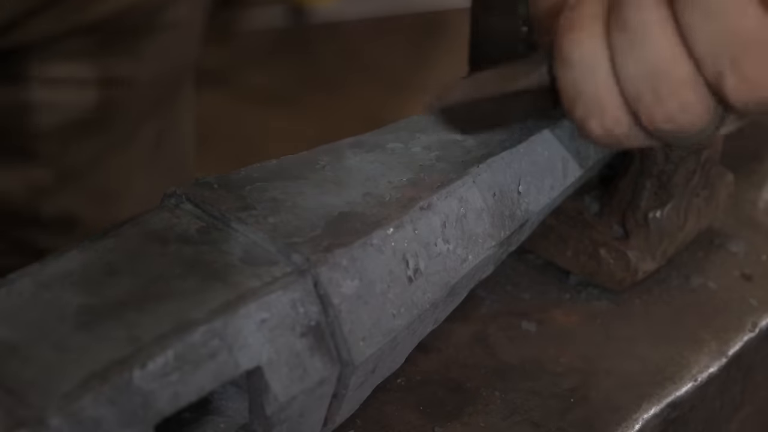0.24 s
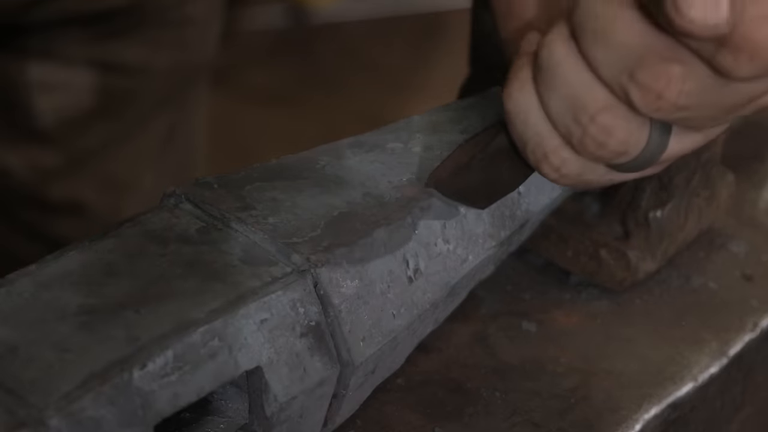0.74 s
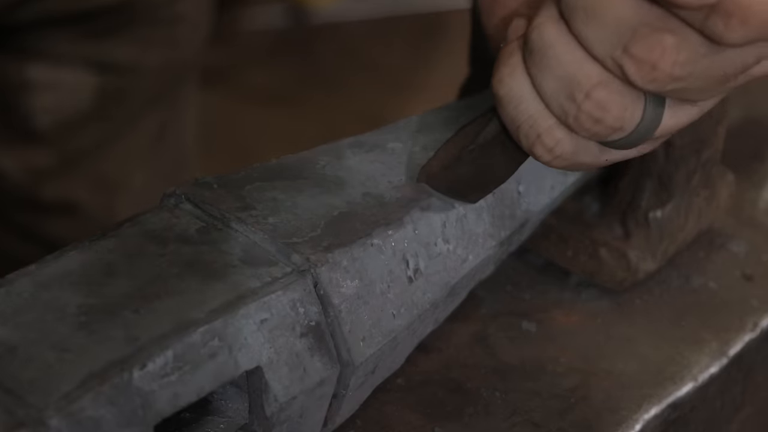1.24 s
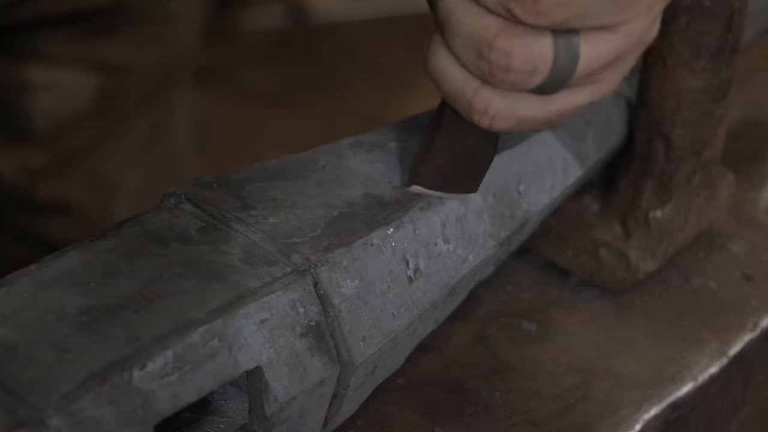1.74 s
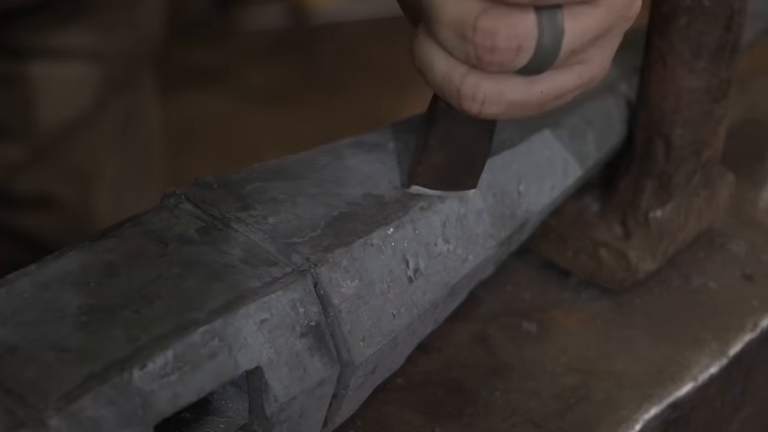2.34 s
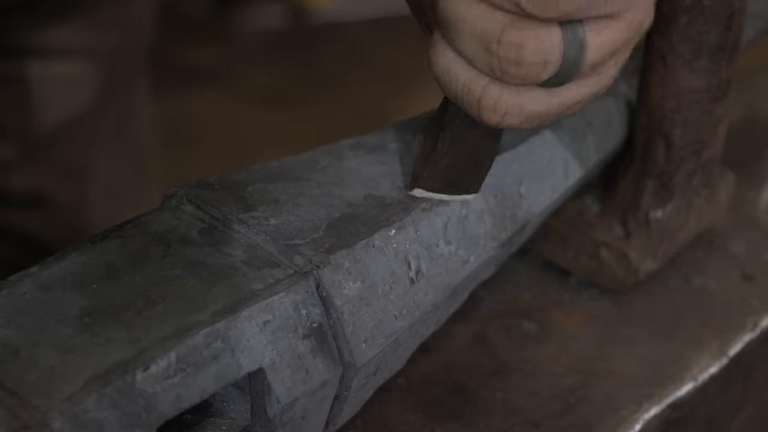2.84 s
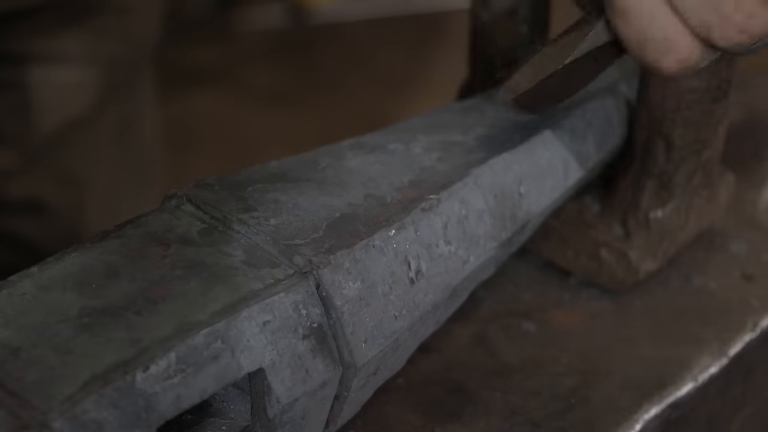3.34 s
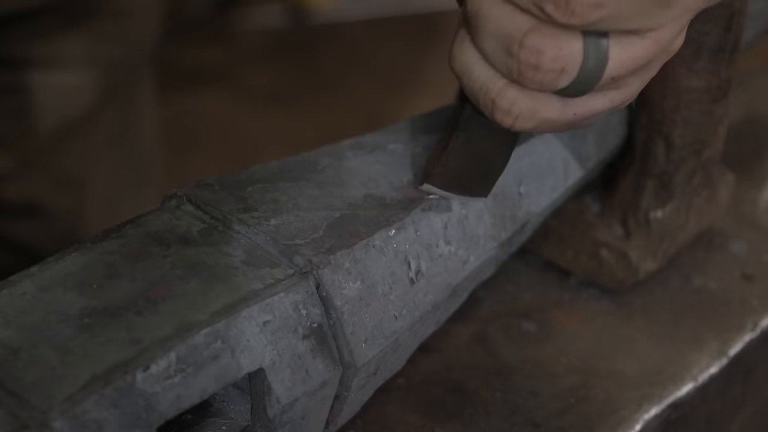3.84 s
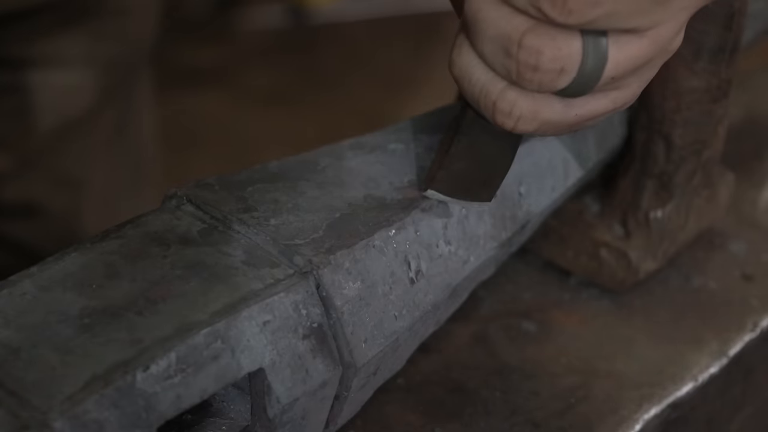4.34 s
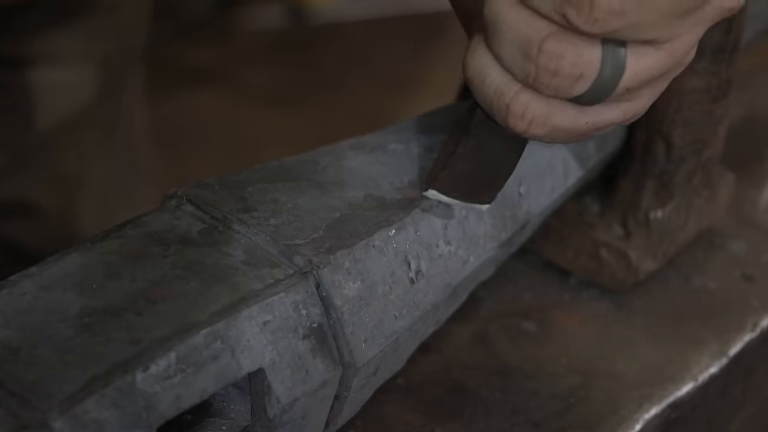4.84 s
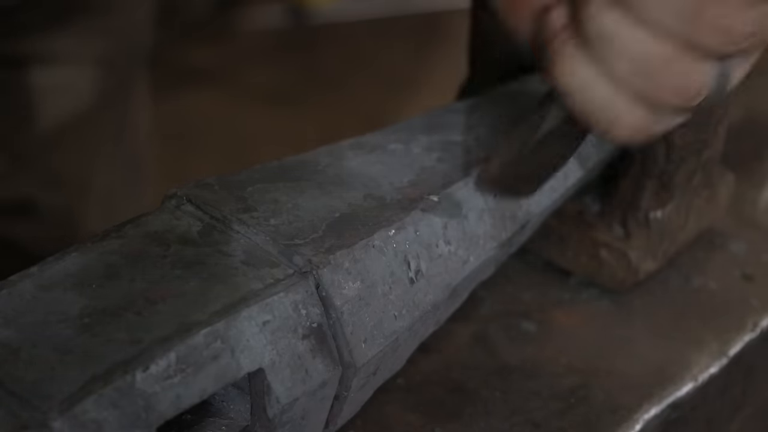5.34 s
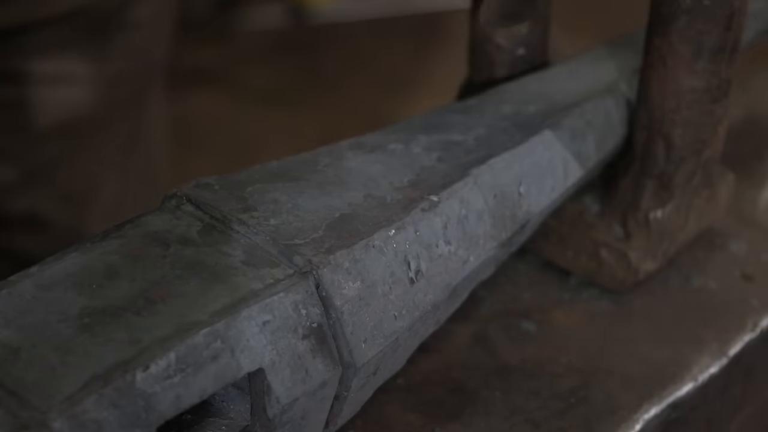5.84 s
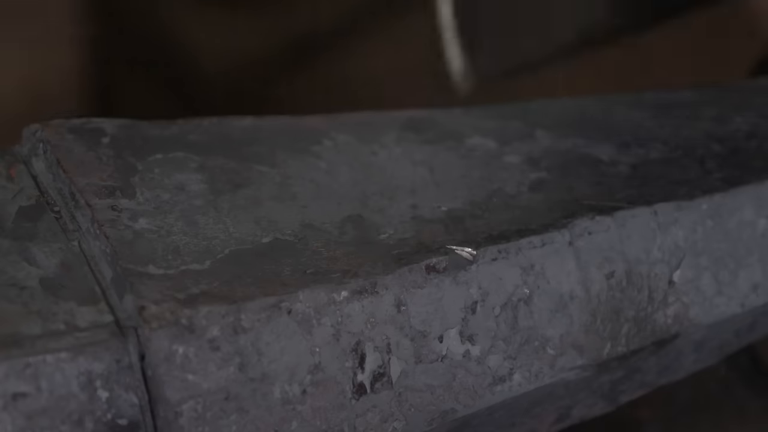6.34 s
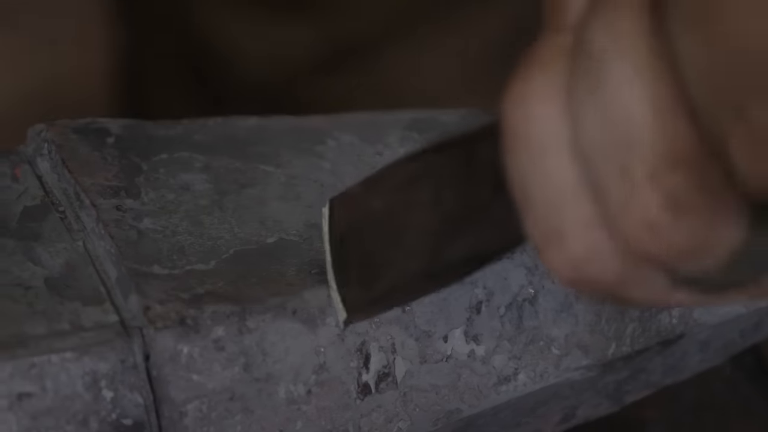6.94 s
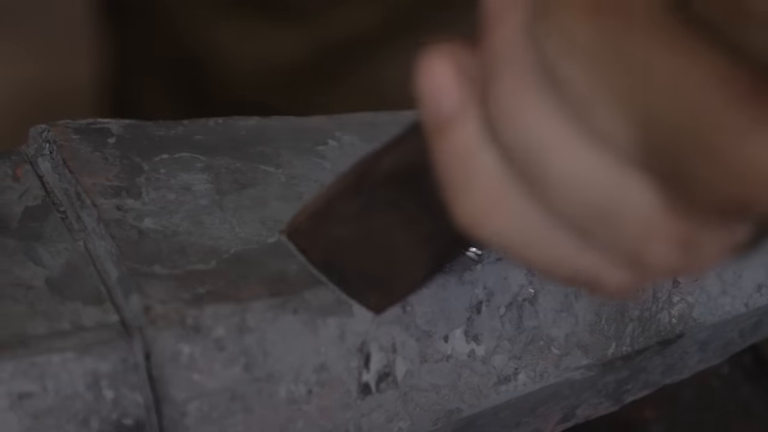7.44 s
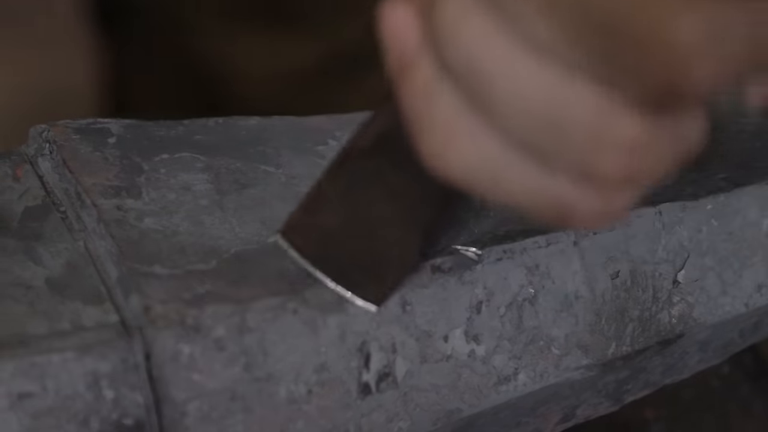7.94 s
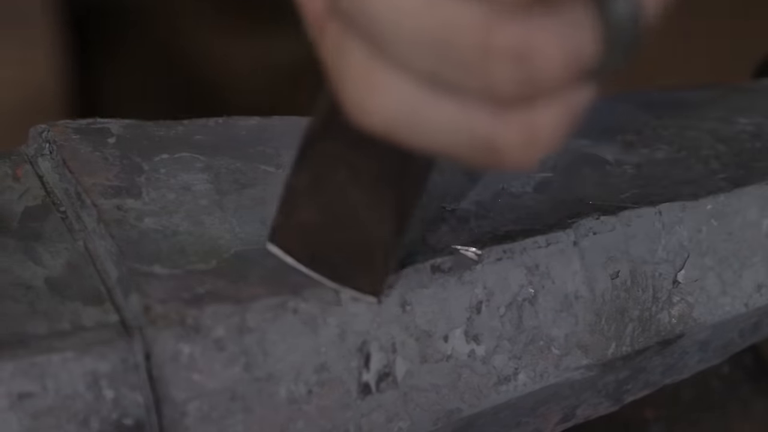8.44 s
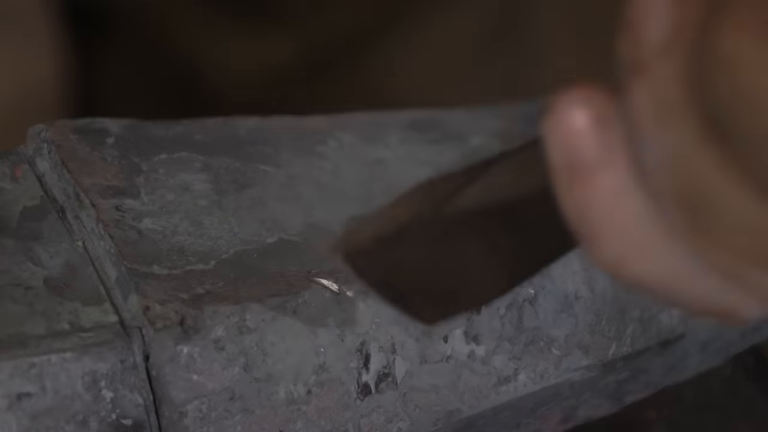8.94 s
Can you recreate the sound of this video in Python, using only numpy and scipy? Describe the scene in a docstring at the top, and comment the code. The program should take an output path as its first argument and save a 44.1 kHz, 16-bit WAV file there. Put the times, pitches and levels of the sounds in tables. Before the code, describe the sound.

Close in a small hard-walled workshop, a hand hammer strikes a steel chisel seven times at about two blows a second, each a hard, short clank. A bare anvil blow rings thinly, one more chisel blow and another anvil ring follow, then quiet light scrapes. A fast uneven ratchet rasp comes late, with one last anvil blow in it.

```python
"""In a small hard-walled workshop a hand hammer drives a steel chisel along a forged bar on an anvil.
Three blows land on the bare anvil, which rings in thin decaying modes; near the end a ratchet rasps.
Blows are filtered impulses with dying noise and damped modes; rubbing is grainy noise through resonances.
Touches of the chisel, dull knocks and thuds, a low murmur of air and faint tones lie underneath.
The loudest peaks are flattened."""
import sys
import numpy as np
from scipy import signal
from scipy.fft import rfft, irfft, next_fast_len
from scipy.io import wavfile
from scipy.ndimage import uniform_filter1d, map_coordinates

SR = 44100
rng = np.random.default_rng(int(sys.argv[2]) if len(sys.argv) > 2 else 0)


def amplitude_ratio(level_db):
    """Convert a level in decibels to the matching linear amplitude (field) ratio."""
    exponent = np.asarray(level_db, float) / 20
    return 10 ** exponent


def master(y):
    """Save y as 16-bit WAV."""
    cut = np.clip(np.atleast_2d(y).T, -1, 1)
    pcm = np.round(cut * 32767)  # scale
    wavfile.write(sys.argv[1], SR, pcm.astype(np.int16))


N = 404832
LENGTH = SR * 7 // 10  # samples that one event may last

# hands and tools slide over scaly steel: start_s, length_s, level_db, fizz_db (relative to the stroke), pitch_hz
STROKES = [(2.961, 0.088, -47.5, -20, 2500), (3.182, 0.016, -52.5, -17, 2500),
           (3.61, 0.15, -53.5, -21, 2550), (3.803, 0.12, -58, -14.5, 2600),
           (3.916, 0.088, -56.5, -16, 2300), (4.125, 0.013, -61, -10.5, 3100),
           (4.861, 0.15, -51.5, -15.5, 5200), (5.055, 0.019, -55, -15, 3640), (5.49, 0.084, -53, -15, 4920),
           (5.582, .04, -51, -5, 7620), (5.635, 0.068, -48, -17, 4230), (5.72, .075, -50.5, -14, 3640),
           (5.817, .04, -48, -8.5, 3650), (5.921, .06, -61.5, -15.5, 2660), (6.215, 0.046, -55, -20, 1370),
           (6.715, 0.043, -57.5, -24, 2700), (7.835, .02, -44, -13, 2900), (7.848, .07, -36.5, -17, 840)]


def unit(x):
    """Normalisation: scale to rms 1."""
    return x / np.sqrt(np.mean(x ** 2) + 1e-20)


def along(points, hz):
    """Linear interpolation of (hz, value) points on a logarithmic frequency axis."""
    point_hz, value = np.transpose(points)
    return np.interp(np.log(hz + 1), np.log(point_hz + 1), value)


def coloured(spectrum, x):
    """Spectral shaping: noise multiplied by a smooth magnitude response, at rms 1."""
    size = next_fast_len(N + 8192)
    gain = amplitude_ratio(along(spectrum, np.fft.rfftfreq(size, 1 / SR)))
    return unit(irfft(rfft(x, size) * gain, size)[:N])


def onset(rise_s):
    """Exponential approach: a response that builds up with this time constant."""
    return 1 - np.exp(-np.arange(LENGTH) / SR / rise_s)


def impulse(spectrum, tilt_db):
    """Minimum phase by the folded cepstrum: causal pulses of peak 1, one per tilt (dB per octave) about 2 kHz."""
    hz = np.fft.rfftfreq(4096, 1 / SR)
    level_db = along(spectrum, hz) + np.outer(tilt_db, np.log2(hz / 2000 + .05))
    cepstrum = irfft(np.log(amplitude_ratio(level_db) + 1e-6))
    cepstrum[:, 1:2048] *= 2
    cepstrum[:, 2049:] = 0
    pulse = irfft(np.exp(rfft(cepstrum)))
    pulse = pulse / abs(pulse).max(1, keepdims=True)
    return np.pad(pulse, ((0, 0), (0, LENGTH - 4096)))


def ringing(hz, db, t60, scatter_db):
    """Modal superposition: one sum of exponentially damped modes per row of levels."""
    t = np.arange(LENGTH) / SR
    decay = amplitude_ratio(-60 * t / np.c_[t60])
    modes = decay * np.cos(2 * np.pi * np.c_[hz] * t) * onset(.0002)
    return amplitude_ratio(db + scatter_db * rng.standard_normal(np.shape(db))) @ modes


def in_shop(times, sounds, wet_db, build_up_s=0.0032):
    """Reverberation: direct sound plus convolution with noise that decays faster in some bands than others."""
    # decay of the room: frequency_hz, t60_s
    room_decay = [(60, 0.35), (400, 0.55), (1100, 0.41), (3000, 0.41), (7500, .3), (15000, 0.25)]
    hz, t, z = signal.stft(rng.standard_normal(sounds.shape), SR, nperseg=256)
    z = z * amplitude_ratio(-60 * t / along(room_decay, hz)[:, None])
    tails = signal.istft(z, SR, nperseg=256)[1][:, :LENGTH]
    tails = tails * onset(build_up_s)
    tails = tails / np.linalg.norm(tails, axis=1, keepdims=True)
    reflected = signal.fftconvolve(sounds, tails, axes=1)[:, :LENGTH]
    heard = sounds + np.c_[amplitude_ratio(wet_db)] * reflected
    out = np.zeros(N + LENGTH)
    for start_s, sound in zip(times, heard):
        out[round(start_s * SR):][:LENGTH] += sound
    return out[:N]


def flutter(count, rate):
    """Band-limited random modulation: smooth curves through random knots, rate knots a second."""
    knots = rng.standard_normal((count, int(rate * N / SR) + 4))
    return np.array([map_coordinates(k, [np.arange(N) * rate / SR]) for k in knots])


def loose(count, rough, rate):
    """Amplitude modulation by a shifting contact: each event flutters fast and at random."""
    knots = rng.standard_normal((count, 600))
    return 1 + rough * np.array([map_coordinates(k, [np.arange(LENGTH) * rate / SR]) for k in knots])


def chatter(count, t60):
    """Repeated rebound of loose steel on steel: exponentially dying noise per event."""
    return amplitude_ratio(-60 * np.arange(LENGTH) / SR / np.c_[t60]) * rng.standard_normal((count, LENGTH))


def strike(tilt_db, thump_db, thump_hz, chatter_db, chatter_t60, bar_db):
    """Impulsive excitation: contact crack and chatter, the modes of the bar, the boom of stand and floor."""
    # steel on steel: frequency_hz, relative density_db per Hz
    crack_spectrum = [(24, -52.5), (40, -25.5), (479, -13), (615, -9), (733, -9), (896, -6), (1440, -5.5),
                      (1590, -7.5), (2700, 1.5), (4930, -10), (12800, -22.5), (16000, -36.5)]
    # the clamped bar and its stand: frequency_hz, level_db, t60_s
    bar_modes = [(210, -20, .12), (610, -16, .13), (910, -10, .15), (1320, -12, .14), (1620, -9, .12),
                 (2030, -5, .11), (2400, -7, .11), (2640, -6, .12), (2720, -8, .11), (2950, -7, .11),
                 (3090, -7, .12), (3470, -9, .11), (4250, -12, .08), (5480, -14, .07), (6100, -14, .07)]
    crack = impulse(crack_spectrum, tilt_db)
    rattle = signal.fftconvolve(crack, chatter(len(crack), chatter_t60), axes=1)[:, :LENGTH]
    hz, level_db, t60 = np.transpose(bar_modes)
    bar_tilt_db = np.outer(tilt_db, np.log2(np.maximum(hz, 700) / 2000))
    bar = ringing(hz, level_db + bar_tilt_db, t60, scatter_db=1.5)
    bar = bar * loose(len(crack), rough=3, rate=260)
    boom = ringing([thump_hz], np.c_[thump_db - 15], [.45], scatter_db=1.5)
    boom = boom * onset(0.02)  # the boom takes a moment to swell
    return crack + amplitude_ratio(chatter_db) * rattle + amplitude_ratio(bar_db) * bar + boom


def hush():
    """Broadband noise: the shop's low murmur of air, with thin sinusoids that come and go."""
    # shop hush: frequency_hz, relative density_db per Hz
    air_spectrum = [(15, -39), (25, -16), (84, -2.5), (212, -6.5), (263, -4), (317, -12), (451, -11),
                    (545, -15), (591, -7.5), (863, -12), (936, -14.5), (1700, -17.5), (4140, -26),
                    (16000, -43)]
    # course of the hush: time_s, rms level_db
    air_levels = [(0, -53), (3.3, -61.5), (4.4, -62.5), (6.11, -61.5), (6.14, -59), (6.7, -58.5),
                  (7.7, -61.5), (9.18, -59)]
    # faint far tones: start_s, length_s, frequency_hz, amplitude level_db
    tones = [(2.9, 4.1, 466, -69), (3.947, 0.13, 4000, -67), (6.101, .35, 4090, -81),
             (6.82, .18, 4100, -77), (7.04, .28, 4840, -79), (7.619, .2, 4075, -77)]
    t = np.arange(N) / SR
    level = amplitude_ratio(np.interp(t, *np.transpose(air_levels)))
    out = level * coloured(air_spectrum, rng.standard_normal(N))
    for start_s, length_s, hz, db in tones:
        fade = np.clip(np.minimum(t - start_s, start_s + length_s - t) / 0.045, 0, 1)
        out += amplitude_ratio(db) * fade * np.sin(2 * np.pi * hz * t)
    return out


def strokes():
    """Friction envelope: every stroke catches, holds unevenly and dies away; one gain curve each."""
    rise_s, fade_db_per_s, uneven_db = 0.0077, 201, 1
    start_s, length_s, level_db = np.transpose(STROKES)[:3, :, None]
    t = np.arange(N) / SR
    rise = np.clip((t - start_s) / rise_s, 0, 1)
    shape = rise * amplitude_ratio(level_db - fade_db_per_s * np.maximum(t - start_s - length_s, 0))
    return shape * amplitude_ratio(uneven_db * flutter(count=1, rate=25))


def scrape():
    """Friction excitation: scale flakes catch in uneven grains under an edge and wake the steel's resonances."""
    # grains of scale: frequency_hz, relative density_db per Hz
    scale_spectrum = [(180, -31.5), (300, 10), (405, 3), (737, -5), (1320, 1.5), (1480, -6.5), (2360, 3.5),
                      (3640, -3), (3950, -2), (11700, -43), (16000, -38)]
    # the finest flakes: frequency_hz, relative density_db per Hz
    fizz_spectrum = [(3000, -20.5), (6500, 2.5), (10000, -9), (15000, -12.5)]
    # resonances of the rubbed steel: frequency_hz, bandwidth_hz, level_db
    resonances = [(830, 160, -0.5), (1320, 140, -8), (1720, 77, 1.5), (2418, 200, -7), (2700, 300, -5),
                  (3100, 240, -3), (3720, 52, 0.5), (4230, 130, -3), (5000, 220, -0.5), (7610, 110, -9)]
    wake_db, wake_octaves = 12, .12  # the resonance nearest the pitch of a stroke sings out
    stroke = strokes()
    fizz_db, pitch_hz = np.transpose(STROKES)[3:]
    sparse = (rng.random(N) < .006) * rng.standard_normal(N) * 6
    flakes = sparse + rng.standard_normal(N)
    grains = coloured(scale_spectrum, flakes)
    size = next_fast_len(N)
    f = np.fft.rfftfreq(size, 1 / SR)
    spectrum = rfft(grains, size)
    catches = amplitude_ratio(3 * flutter(len(resonances), rate=12))  # each resonance comes and goes
    sung = np.zeros(N)
    for catch, (hz, width_hz, db) in zip(catches, resonances):
        nearness = np.exp(-(np.log2(hz / pitch_hz) / wake_octaves) ** 2)
        woken = amplitude_ratio(wake_db * nearness) @ stroke
        bandpass = 1j * f * width_hz / (hz ** 2 - f ** 2 + 1j * f * width_hz)
        sung += catch * amplitude_ratio(db) * woken * irfft(spectrum * bandpass, size)[:N]
    fizz = (amplitude_ratio(fizz_db) @ stroke) * coloured(fizz_spectrum, flakes)
    return amplitude_ratio(-8.5) * stroke.sum(0) * grains + amplitude_ratio(-0.5) * sung + fizz


def knocks():
    """Soft excitation: dull knocks as crack and ringing steel, over thuds of low damped modes."""
    # dull knocks and thuds, among them a hammer rebound and the thud under a light blow:
    # start_s, strength_db, brightness_db per octave, thud_db (relative to strength)
    dull_sounds = [(4.219, -62, -3.5, 18.5), (6.135, -50.5, -6, -6), (6.232, -50, -8, -9),
                   (7.81, -65.5, -3, 20.5), (7.856, -26, -2, -2), (8.374, -25.5, 1.5, -15.5),
                   (8.551, -11, -3.5, -17), (8.835, -22.5, -2.5, -8.5)]
    # low, wooden-sounding modes of the thud: frequency_hz, level_db, t60_s
    thud_modes = [(200, -6, .17), (260, -6, .12), (380, -9, .08), (520, -4, .09), (680, -4, .08),
                  (850, -3, .08), (1400, -8, .06)]
    start_s, strength_db, tilt_db, thud_db = np.transpose(dull_sounds)
    hz, level_db, t60 = np.transpose(thud_modes)
    thud = ringing(hz, np.c_[thud_db] + level_db, t60, scatter_db=2.5)
    thud = thud * loose(len(start_s), rough=2, rate=140)
    thud = thud * onset(0.003)  # a soft attack
    thump_db = np.full(len(start_s), -32.0)
    clank = strike(tilt_db, thump_db, thump_hz=85, chatter_db=-10.0, chatter_t60=0.21, bar_db=-16.5)
    return in_shop(start_s, np.c_[amplitude_ratio(strength_db)] * (clank + thud), wet_db=-1.0)


def ticks():
    """Free vibration: light touches ring the loose chisel; a sideways one wakes its lowest bending mode."""
    # the loose chisel touches down: start_s, level_db, low_db (added to the lowest mode)
    touches = [(0.4878, -20.5, -18), (3.1951, -58.5, 0), (3.8252, -46, 2), (4.0647, -33, -18),
               (4.1295, -46, -30), (4.8894, -54, -17), (6.9945, -43.5, -3.5), (7.0509, -49.5, -6)]
    # the loose chisel: frequency_hz, level_db, t60_s
    chisel_modes = [(705, 0, .26), (3065, 0, .035), (4820, -32, .08), (7450, -13, .022), (10050, -28, .025)]
    start_s, touch_db, low_db = np.transpose(touches)
    hz, level_db, t60 = np.transpose(chisel_modes)
    levels_db = np.c_[touch_db] + level_db + np.outer(low_db, hz == hz.min())
    return in_shop(start_s, ringing(hz, levels_db, t60, scatter_db=0.5), wet_db=-10)


def ratchet():
    """Impulse train with early reflections: each tooth snaps and comes back off bench and anvil."""
    # ratchet teeth: start_s, level_db (before a common lift)
    teeth = [(7.9604, -7.5), (7.9713, -0.5), (7.9827, 1), (7.9982, 1.5), (8.0255, 2.5), (8.042, -2.5),
             (8.0708, 1.5), (8.0967, -6), (8.11, -4.5), (8.1341, -7.5), (8.1784, 0.5), (8.1908, 2),
             (8.2198, -6.5), (8.2345, 3), (8.2524, -5.5), (8.2689, -7), (8.284, -3.5), (8.316, -6),
             (8.3344, -2.5), (8.365, -3), (8.3738, -4), (8.3796, -4.5), (8.3955, -6.5), (8.4105, -5),
             (8.425, -9.5), (8.4349, -10.5), (8.4448, -10.5), (8.4569, -2), (8.4677, -2), (8.4842, -6),
             (8.5003, -5), (8.518, 0.5), (8.6041, -4.5), (8.6348, -5.5), (8.6604, -5), (8.6716, -7),
             (8.6842, -3.5), (8.6994, -11), (8.7166, -3), (8.7328, -5), (8.7541, -2.5), (8.7702, -7.5),
             (8.787, -5.5)]
    # snap of a tooth: frequency_hz, relative density_db per Hz
    tooth_spectrum = [(59, -41), (100, -29), (350, -3), (461, -9.5), (854, -6), (950, -7.5), (1910, -5),
                      (2370, 0), (8110, -5), (9410, -4), (16000, -11.5)]
    # near echoes: delay_s, level_db
    reflections = [(.00033, -5), (.0011, -14), (.00145, -13), (.00225, -6), (.00305, -14), (.0039, -16)]
    start_s, level_db = np.transpose(teeth)
    snap = impulse(tooth_spectrum, 0.35 * rng.standard_normal(len(start_s)))
    echoes = sum(amplitude_ratio(db) * np.roll(snap, round(delay_s * SR), 1) for delay_s, db in reflections)
    buzz = signal.fftconvolve(snap, chatter(len(start_s), t60=.07), axes=1)[:, :LENGTH]
    clicks = snap + echoes + amplitude_ratio(-25) * buzz
    return in_shop(start_s, np.c_[amplitude_ratio(level_db + 1.5)] * clicks, wet_db=-7.5)


def anvil():
    """Modal excitation by position: bare steel rings in thin modes, each best from its own spot."""
    # hammer on the anvil face: start_s, strength_db, brightness_db per octave,
    # thump_db (relative to strength), spot in turns round the face
    taps = [(2.706, 0, -4, -12.5, 0), (5.104, -2, -1.7, -11, .33), (8.526, -2, -1.47, -11.5, .67)]
    # anvil and hammer head: frequency_hz, level_db, t60_s, best_spot in turns round the face
    anvil_modes = [(830, -11, .22, .66), (1553, -9, .17, .83), (1868, -43, 1.2, .69), (3425, -8, .15, .22),
                   (4815, -7, .08, .17), (4828, -25, .95, .71), (4829, -3, .2, .7), (5286, -14, .18, .32),
                   (5466, -13, .15, .34), (6158, -12, .26, .66), (7180, -45, 1.1, .16),
                   (7500, -5, .08, .27), (8096, -13.5, .2, .94), (8428, -15, .25, .6),
                   (8810, -11, .34, .73), (8836, -32, .9, .67), (8999, -14, .29, .34),
                   (9192, -10.5, .25, .25), (9252, -13, .3, .63), (9668, -19, .3, .36),
                   (10275, -30, .4, .9), (10830, -10, .22, .76), (10966, -10.5, .15, .99),
                   (11200, -20, .22, .97), (11719, -15, .62, .15), (11720.5, -21, .57, .36),
                   (11862, -6, .23, .83), (12745, -17, .16, .96), (13890, -15, .13, .2),
                   (14590, -11, .13, .98), (15140, -14, .11, .01)]
    off_spot_db, per_t60_db = 5, 14  # loss a quarter turn off the best spot; more per second of t60
    start_s, strength_db, tilt_db, thump_db, spot = np.transpose(taps)
    hz, level_db, t60, best_spot = np.transpose(anvil_modes)
    blow = strike(tilt_db, thump_db, thump_hz=57, chatter_db=-6.0, chatter_t60=.1, bar_db=-21.0)
    blow = np.c_[amplitude_ratio(strength_db)] * blow
    off_spot = 1 - np.cos(2 * np.pi * (np.c_[spot] - best_spot))
    woken_db = level_db - (off_spot_db + per_t60_db * t60) * off_spot
    ring = ringing(hz, woken_db, t60, scatter_db=0)
    ring = ring * loose(len(start_s), rough=.12, rate=500) * onset(.001)
    return in_shop(start_s, blow, wet_db=-9.5) + in_shop(start_s, ring, wet_db=-17.5)


def chiselling():
    """Boundary-dependent modes: the gripped chisel sings briefly at pitches set by its seat in the cut."""
    # hammer on chisel: start_s, strength_db, pitch_hz, second_note_hz, brightness_db per octave
    blows = [(.086, -1, 2473, 4230, -0.5), (.512, -0.75, 2700, 4084, -0.3),
             (0.936, -1.5, 2333, 4388, -0.54), (1.347, -1, 2884, 3976, -0.8),
             (1.752, -1, 2113, 3840, -0.48), (2.151, -0.6, 2564, 3880, -0.5), (2.535, -1, 2460, 2049, -0.7),
             (4.214, -25, 2030, 5860, 7.5), (4.576, -2.5, 1900, 2612, -1.5)]
    full_chatter_t60_s, chatter_grows = .15, .5  # at 0 dB; dB of length per dB of strength
    light_sings, shake, shake_grows = .6, 5, .6  # a light blow sings louder for its strength, shaken less
    start_s, strength_db, low_hz, high_hz, tilt_db = np.transpose(blows)
    count = len(start_s)
    alone_db = np.where(np.eye(count), 0, -200) - light_sings * strength_db  # each blow has its own notes
    chisel = ringing(low_hz, alone_db - 15, np.full(count, .09), scatter_db=0)
    chisel = chisel + ringing(high_hz, alone_db - 17, np.full(count, .05), scatter_db=0)
    chisel = chisel * loose(count, rough=np.c_[shake * amplitude_ratio(shake_grows * strength_db)], rate=700)
    chatter_t60 = full_chatter_t60_s * amplitude_ratio(chatter_grows * strength_db)
    thump_db = np.full(count, -18.0)
    sounds = strike(tilt_db, thump_db, thump_hz=87, chatter_db=-6.5, chatter_t60=chatter_t60, bar_db=-11)
    return in_shop(start_s, np.c_[amplitude_ratio(strength_db)] * (sounds + chisel), wet_db=-5.5)


def scene():
    """Linear superposition of all sources, heard from one close spot."""
    background = hush() + scrape() + knocks()
    return (background + ticks() + ratchet() + anvil() + chiselling())[None]


def roll_off(x):
    """The treble ends steeply here."""
    return signal.sosfilt(signal.butter(12, 16460, fs=SR, output="sos"), x)


def record(dry):
    """Saturation and filtering: the input stage flattens peaks, lifts the treble and cuts the deepest bass."""
    ceiling = 0.62
    clipped = dry / (1 + np.abs(dry / ceiling) ** 10) ** (1 / 10)
    treble = clipped - uniform_filter1d(clipped, size=5)
    lifted = clipped + .45 * treble
    steady = signal.sosfilt(signal.butter(2, 40, "high", fs=SR, output="sos"), lifted)
    return roll_off(steady)


dry = scene()
out = record(dry)
master(out)
```